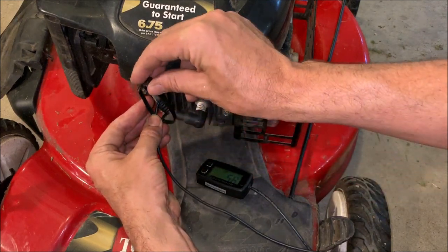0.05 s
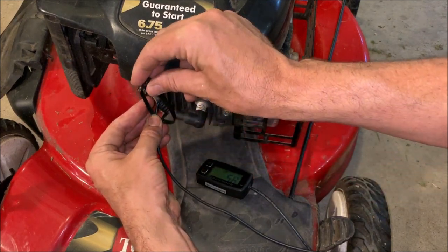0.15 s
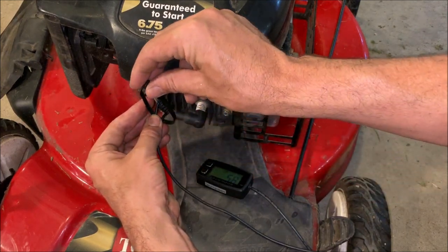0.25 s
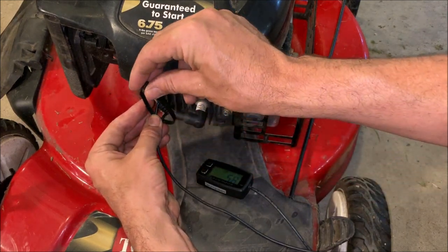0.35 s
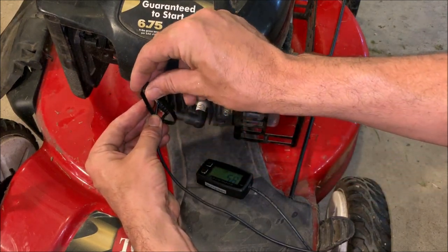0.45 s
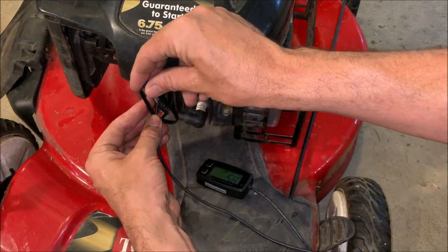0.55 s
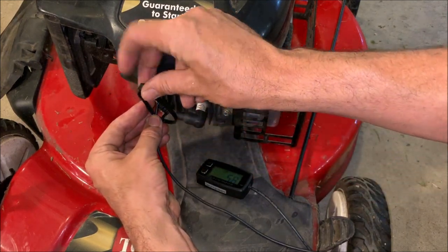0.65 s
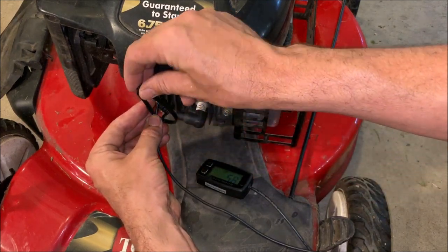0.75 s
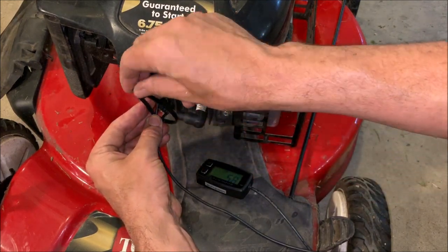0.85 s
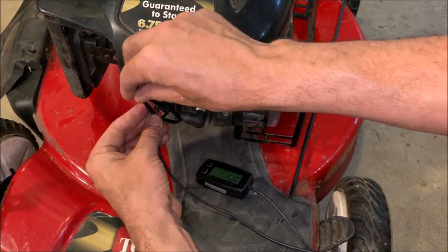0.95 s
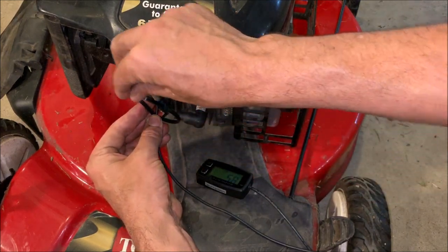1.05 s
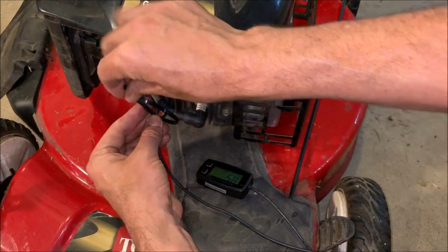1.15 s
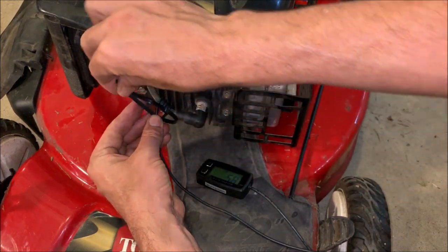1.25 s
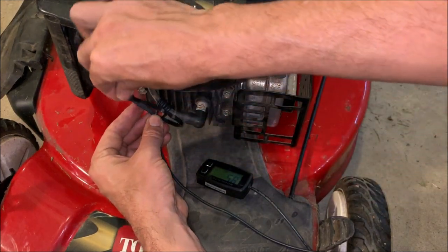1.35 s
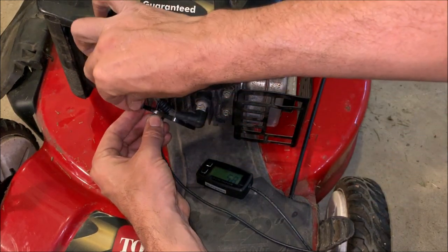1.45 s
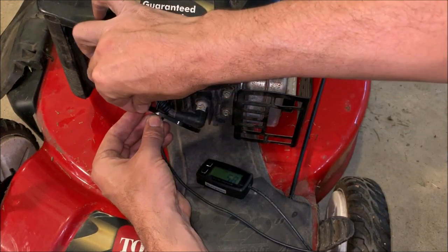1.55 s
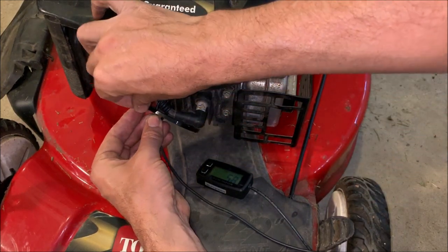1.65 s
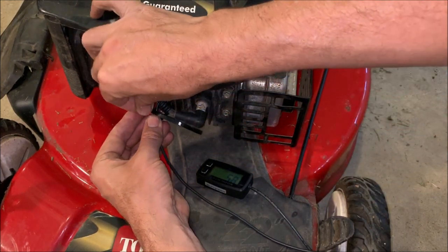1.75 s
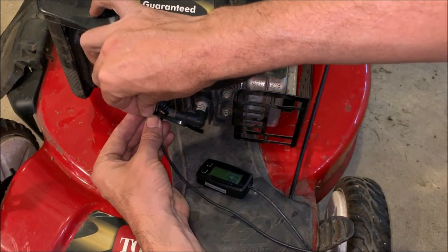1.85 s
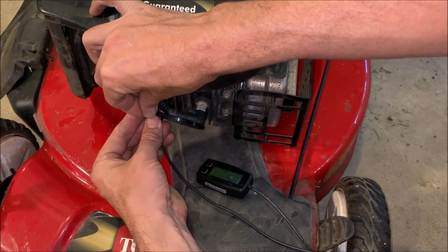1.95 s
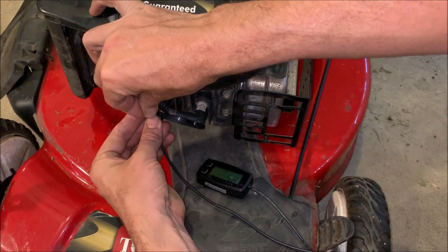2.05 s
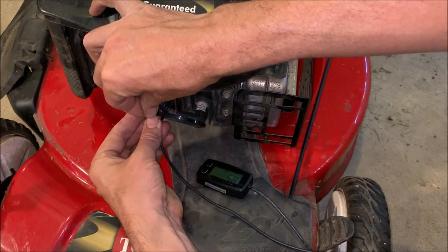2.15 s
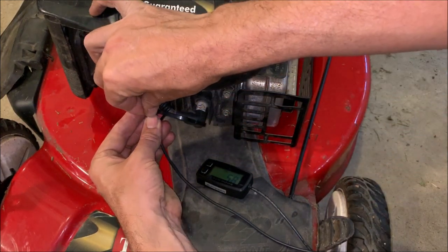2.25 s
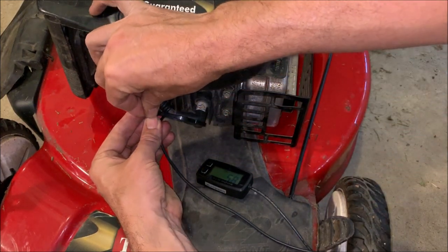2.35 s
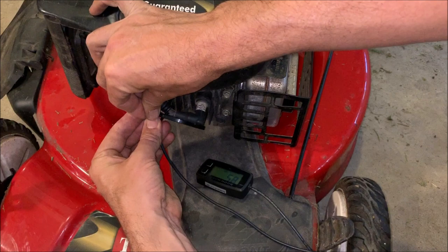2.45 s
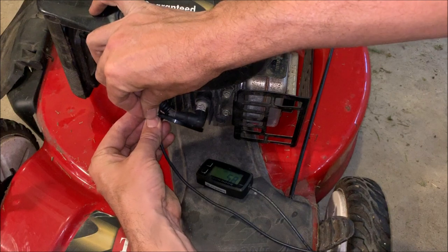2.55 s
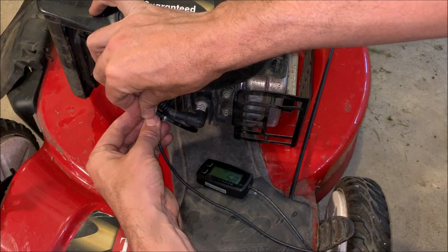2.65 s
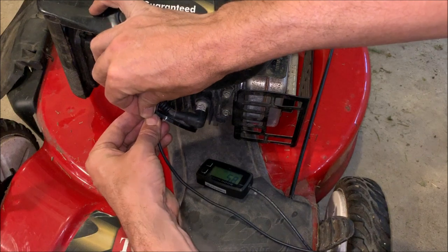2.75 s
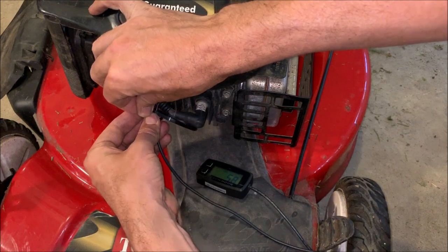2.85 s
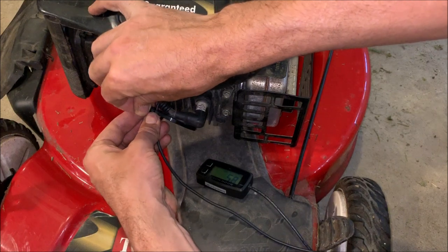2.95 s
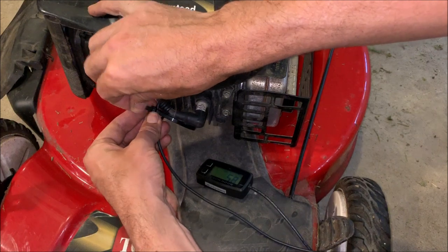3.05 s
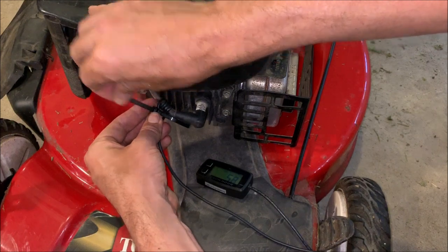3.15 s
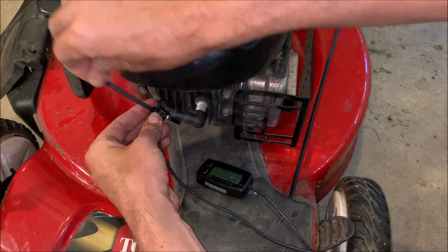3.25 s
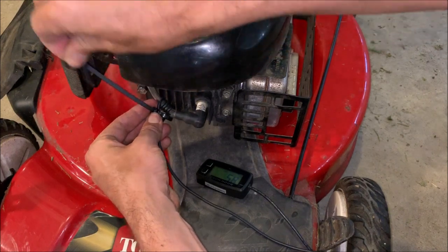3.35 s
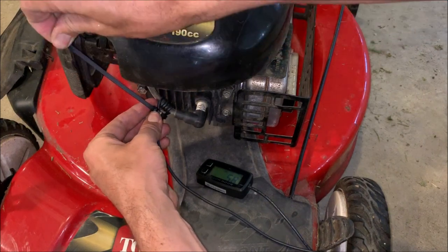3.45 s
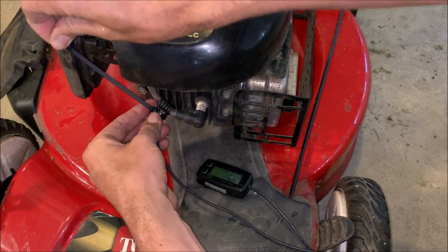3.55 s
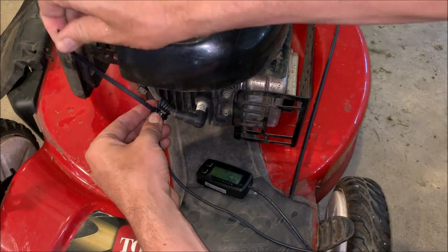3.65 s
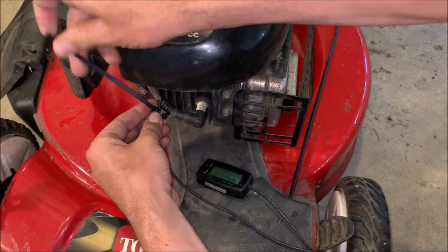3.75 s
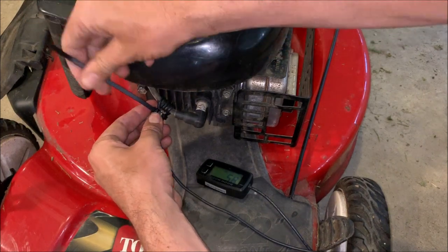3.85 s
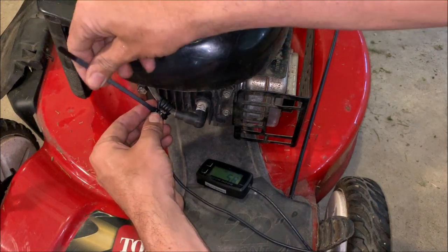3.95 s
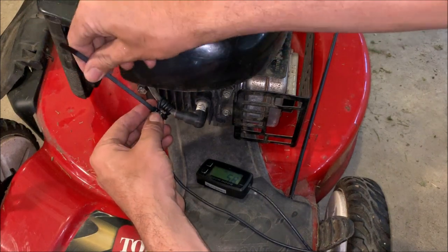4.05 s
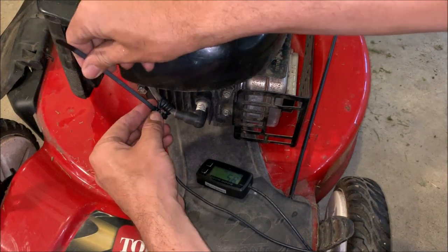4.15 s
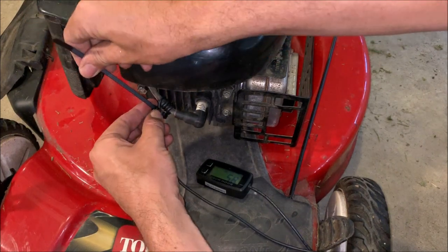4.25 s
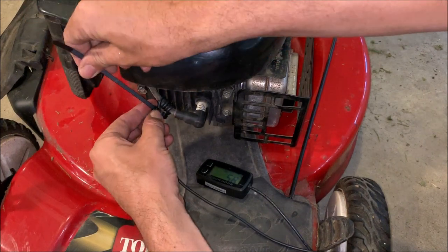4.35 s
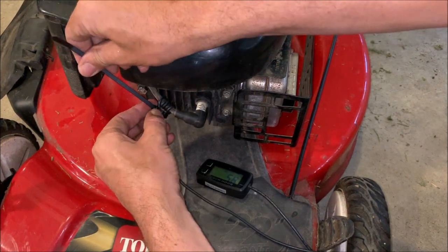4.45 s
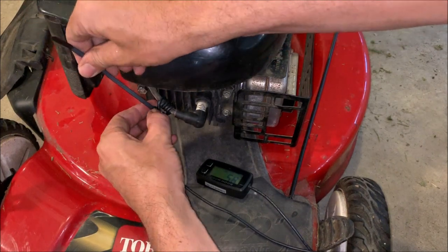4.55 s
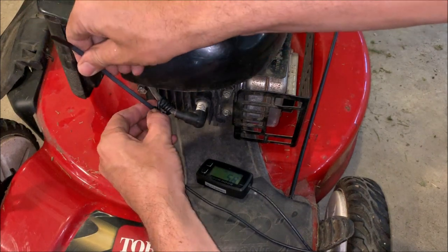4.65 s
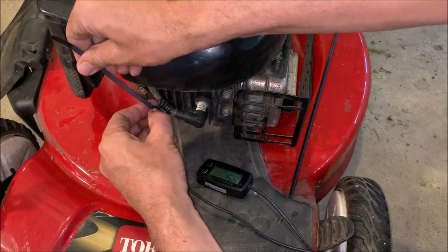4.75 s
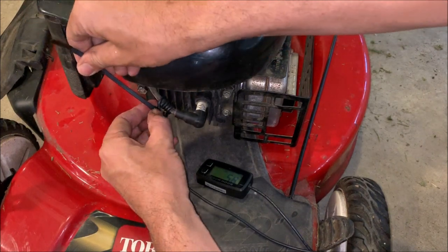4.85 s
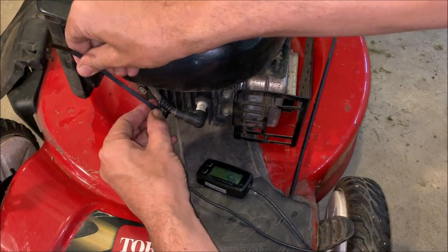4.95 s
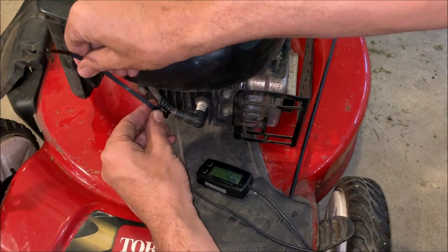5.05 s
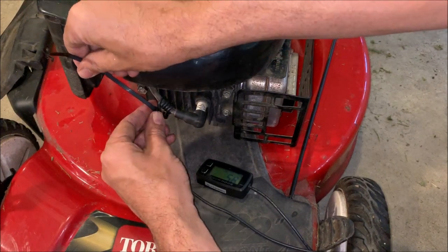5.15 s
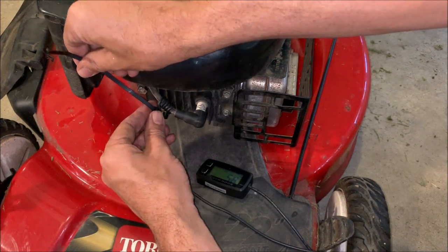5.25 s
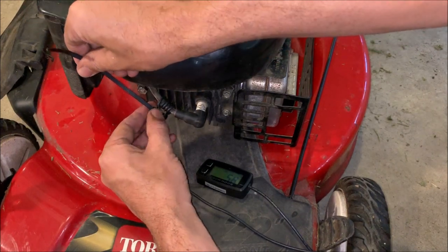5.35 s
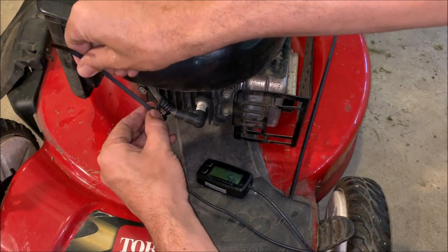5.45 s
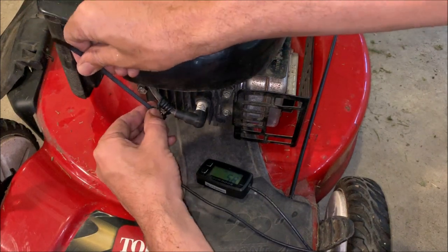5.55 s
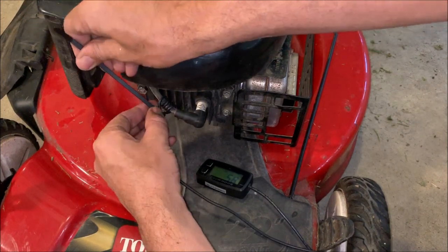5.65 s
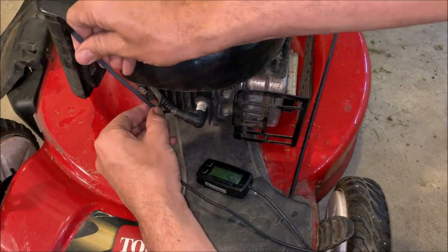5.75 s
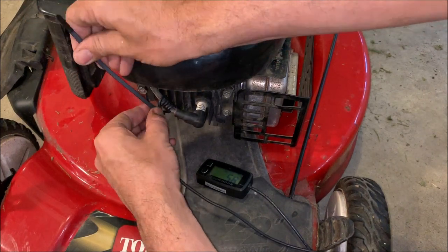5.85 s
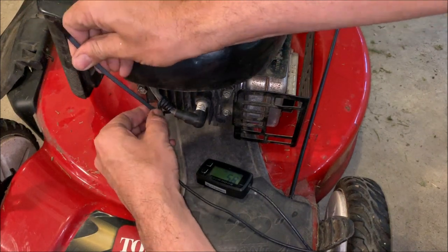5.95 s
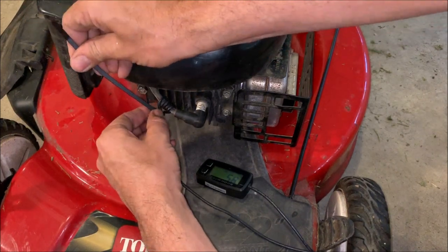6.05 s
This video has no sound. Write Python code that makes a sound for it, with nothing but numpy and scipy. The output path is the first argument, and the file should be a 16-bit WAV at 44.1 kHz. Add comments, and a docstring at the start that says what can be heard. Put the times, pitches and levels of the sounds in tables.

```python
"""In a workshop, a plastic cable tie is threaded round a wire on a parked mower and pulled tight in two pulls.
Impulses: a pawl snaps over each tooth, first in single clicks, then a fast zip, then a slower taut ratchet.
Friction and impact: the strap slides, crackles and flicks; fingers rub, squeak and bump, as shaped noise and modes.
Background: steady tones of a motor beat against the mains hum, over fluttering air and filtered room noise."""
import sys
import numpy as np
from scipy import signal
from scipy.fft import rfft, irfft
from scipy.io import wavfile

SR = 44100
rng = np.random.default_rng(int(sys.argv[2]) if len(sys.argv) > 2 else 0)


def pcm_store(signal):
    """Save signal as 16-bit PCM."""
    levels = np.round(np.clip(np.atleast_2d(signal), -1, 1) * 32767)
    wavfile.write(sys.argv[1], SR, levels.astype(np.int16).T)


N = 269451
T = np.arange(N) / SR

# Hum lines of the motor and the mains, before the gain HUM_DB: [f/Hz, rms level/dB]
HUM_LINES = [(58.3, -57), (57.15, -62), (116.62, -48), (120, -52), (233.25, -57), (240, -66)]
HUM_DB = -3.5
HUM_SWELL_S = .453  # a moment at which the beating lines swell together
# Air flutter round the motor's orders: [f/Hz, width/Hz, rms level/dB]
FAN_BANDS = [(56, 8, -66.5), (110, 7.6, -64.5), (171.83, 7, -59)]
# Relative spectra of room air, common to both microphones and opposed between them: [f/Hz, density/dB per Hz]
AIR_COMMON = [(20, -14), (45, 1), (95, 4), (200, 1), (300, -3.5), (450, -10.5), (620, -16), (900, -18.5),
              (1400, -33), (2050, -40), (2350, -35), (2650, -42), (6500, -48), (8700, -44.5), (10700, -54),
              (12700, -43), (16000, -62)]
AIR_OPPOSED = [(20, -15.5), (55, -8), (120, -8), (230, -7), (330, -14), (600, -15.5), (880, -16.5),
               (1300, -29.5), (1900, -36.5), (4000, -43), (9000, -45), (16000, -46.5)]
AIR_COMMON_DB, AIR_OPPOSED_DB = -53.5, -63  # rms
# Time for the room's decay by 60 dB: [f/Hz, t60/s]
ROOM_DECAY = [(200, 0.082), (1000, 0.75), (4000, 0.53), (8000, 0.51), (15000, 0.3)]
# Spread into the room, greater for the lower tones: [f/Hz, level/dB]
ROOM_SPREAD = [(1200, 9), (4000, 4.5), (9000, 2), (13000, -2.5)]
# Share that the mower deck throws back: [f/Hz, level/dB]
DECK_REFLECTION = [(600, -18), (1500, -11), (4000, -4), (6000, -11.5), (9000, -5.5), (13000, -10.5)]
PORT_DELAY_S = 0.0002383  # by which the left microphone leads in the treble
EDGE_HZ = 16450

# Fingers bump the wire, and the flicking strap knocks it once at 4.6 s: [t/s, level/dB, f/Hz]
WIRE_BUMPS = [(0.56, -59.5, 410), (1.556, -64, 1130), (1.824, -68.5, 1124), (2.99, -62.5, 444),
              (4.334, -58, 335), (4.603, -64.5, 457.4), (4.639, -59.5, 322), (5.235, -55, 394),
              (5.424, -56, 347), (5.496, -46, 378)]
# Modes of a bump: [multiple of its f, level/dB, t60/s]
BUMP_PARTIALS = [(1, 10.5, 0.047), (2.15, -6, 0.096), (3.1, -5.5, 0.021), (4.7, -16.5, 0.056),
                 (6.6, -23.5, 0.035), (8.4, -19, 0.017)]
# Strokes of skin on the wire and its boot: [peak t/s, slip level/dB, swell/s, gripping f/Hz, width/Hz]
RUB_STROKES = [(1.02, -65, 0.083, 420, 89), (1.41, -69.5, 0.03, 1200, 900), (1.436, -64.5, 0.07, 377, 60),
               (1.49, -59, 0.07, 394, 30), (1.518, -57, 0.09, 366, 29.8), (1.54, -72, 0.24, 2170, 400),
               (1.56, -64, 0.07, 1140, 600), (1.655, -75, 0.18, 1780, 800), (1.847, -77, 0.07, 1900, 900),
               (1.977, -74.5, 0.14, 1570, 804), (2.31, -76, 0.11, 1420, 600),
               (2.991, -68, 0.014, 1690, 1220), (3.049, -76, 0.5, 1160, 400)]
# Colour of the rubbing: [f/Hz, level/dB]
RUB_SPECTRUM = [(150, -14), (390, 9.5), (600, -1.5), (850, -6.5), (1150, -4), (1900, -12.5), (2400, -16),
                (3200, -22), (8000, -27.5)]
# A fingertip squeaks faintly on the strap: [peak t/s, level/dB, swell/s]
SQUEAK_STROKES = [(4.12, -68, 0.11), (4.33, -75.5, 0.87)]
# Colour of the squeak: [f/Hz, level/dB]
SQUEAK_SPECTRUM = [(900, -30), (1250, -13), (1370, -2.5), (1500, -19.5), (2000, -42.5)]
# The smooth strap slides: [peak t/s, level/dB, swell/s]
SLIDE_STROKES = [(.78, -80.5, 0.44), (1.02, -52, 0.1), (1.29, -65.5, 0.34), (1.53, -65, 0.32),
                 (1.72, -75.5, 0.31), (3.79, -64, 0.25), (3.97, -64, 0.14)]
# The taut strap crackles faintly between the teeth: [peak t/s, level/dB, swell/s]
CRACKLE_STROKES = [(5.80, -42.5, 0.07), (5.92, -51.5, 0.18)]
# Colour of the sliding, the crackling and the haze round each snap: [f/Hz, level/dB]
SLIDE_SPECTRUM = [(1000, -8), (2500, -8), (4000, -6), (6500, -2), (8800, -0.5), (11000, -1), (13300, -3.5),
                  (16000, -18.5)]
SWELL_DB, RELEASE_DB_PER_S = 29, 336.5  # rise over a stroke's swell time; rate of fall after its peak
# The strap flicks against the engine: [t/s, energy/dB]
STRAP_FLICKS = [(4.332, -54.5), (4.592, -50.5), (4.6046, -32), (4.614, -55.5), (5.323, -56.5)]
# Colour of a flick: [f/Hz, level/dB]
FLICK_SPECTRUM = [(100, -28), (400, 3), (1200, 8.5), (2500, -8.5), (3300, 9.5), (4000, 13.5), (4700, 10),
                  (5400, 4), (7300, -1), (8500, 6), (11000, -8.5), (13500, -7), (16000, -11.5)]

# Colours of a tooth's snap with the strap loose, snug, running free and taut: each [f/Hz, level/dB]
LOOSE_SNAP = [(100, -44.5), (600, -30.5), (1100, -13.5), (1750, -18.5), (2300, -22), (3600, -3.5),
              (4700, -6.5), (5800, -2.5), (7500, -6.5), (8500, 3.5), (11000, 1.5), (13000, 3.5), (15000, 0),
              (16500, -7.5)]
SNUG_SNAP = [(100, -31), (600, -30), (1100, -27), (1750, -10), (2300, -30.5), (2800, -17), (3500, -10),
             (4500, -18.0), (5900, -1.5), (7400, -18.5), (8600, -13), (9200, -18.5), (9900, 7.5),
             (10500, 0), (11500, -1.8), (14800, 1), (15600, -5.5), (16400, -17.5)]
RUNNING_SNAP = [(100, -37.5), (550, -28), (1100, -20.5), (1350, -30.5), (1600, -20), (2600, -28),
                (3500, -16.5), (4400, -21), (4900, -17.5), (5600, -22.5), (6800, -9), (7600, -23),
                (8400, 1), (9300, -5.5), (9900, -3.5), (10800, -8.5), (12200, -5), (12900, -1), (13900, 3),
                (14900, 2), (15700, -11), (16400, -68.5)]
TAUT_SNAP = [(100, -32), (600, -24), (1100, -26.5), (1800, -31), (2450, -18), (2900, -20.5), (4200, -20.5),
             (6300, -16.5), (7600, -19.5), (8800, -11), (9400, -15.5), (10300, -5), (11200, -11),
             (12200, -11), (12850, -0.4), (13350, -2.5), (14100, 3), (14800, -4), (15500, -10),
             (16400, -28.5)]
# How long the pawl chatters on a tooth in each of these four states: [duration/s]
CHATTER_TIMES = [0.0016, .0016, .0013, 0.0025]
# The strap's state as the loop closes: [t/s, state: 0 loose, 1 snug, 2 running free, 3 taut]
STRAP_STATE = [(1.03, 0), (3.04, 0.5), (3.245, 2.37), (3.285, 1.5), (3.61, 3), (5.64, 2.5), (5.8, 2.5),
               (5.95, 3)]
# Teeth that click singly, in the light tug, round the zip and in the last hard pull, plus a few faint ticks
# between the teeth of the last pull: [t/s, mean energy/dB]
SINGLE_TEETH = [(0.8902, -35), (0.8985, -37), (.927, -26), (0.954, -28.5), (0.959, -28.5), (0.984, -21.5),
                (0.9966, -17), (1.01, -16.5), (1.0215, -18), (1.033, -22.5), (3.0345, -13), (3.0432, -2.5),
                (3.0639, 0), (3.074, -1.5), (3.088, -4), (3.106, -1), (3.536, 0.5), (3.551, -3),
                (3.5722, -1.5), (3.6113, -4), (5.6499, -1.5), (5.6657, -0.5), (5.687, -2), (5.707, 0.5),
                (5.7304, -1.5), (5.747, -2), (5.7616, -0.5), (5.7743, -2.5), (5.7869, -0.5), (5.8017, -5),
                (5.807, -23), (5.813, -13), (5.853, -17), (5.82, -1.5), (5.8396, -3), (5.8601, -3.5),
                (5.8872, -4), (5.9139, -5), (5.9572, -10), (6.039, -19)]
# The fast zip surges as the strap runs free: [t/s, rate/teeth per s, mean energy of a tooth/dB]
ZIP_SPEED = [(3.1264, 88, -1), (3.14, 150, -1.5), (3.158, 217, -.5), (3.18, 232, -.5), (3.197, 203, 1),
             (3.215, 190, .5), (3.227, 220, .5), (3.233, 350, .5), (3.262, 398, 3.2), (3.285, 385, -1),
             (3.303, 398, -1), (3.32, 355, -1.8), (3.35, 322, -1.5), (3.385, 283, 1.5), (3.405, 288, 2),
             (3.45, 305, .3), (3.472, 350, -2), (3.488, 280, -3), (3.503, 185, -4), (3.53, 110, -4.5)]
# Wire and engine cover ring with each snap: [f/Hz, level relative to the tooth/dB, t60/s]
BODY_MODES = [(360, -52, 0.034), (453, -55, 0.0822), (871.5, -56, 0.06), (1037, -48.5, 0.035),
              (1131, -51, 0.05), (1640, -59.5, 0.025)]
GRIP_S = .2  # the grip, and with it the chatter of a snap, changes over this time
SNAP_SIZE = 1024  # samples
SNAP_HZ = np.fft.rfftfreq(SNAP_SIZE, 1 / SR)


def amp(db):
    """Level law: converts decibels to an amplitude ratio."""
    return 10 ** (np.asarray(db) / 20)


def unit(x):
    """Normalisation: scales to unit rms."""
    return x / np.sqrt(np.mean(x ** 2) + 1e-20)


def read(points, hz):
    """Interpolation: reads a spectrum table on a log-frequency axis."""
    f, value = np.transpose(points)
    return np.interp(np.log(hz + 1), np.log(f + 1), value)


def add(mix, s, sound):
    """Superposition: adds a sound to the mix at time s."""
    part = mix[..., int(s * SR):][..., :sound.shape[-1]]
    part += sound[..., :part.shape[-1]]


def filtered(x, level_db):
    """Linear filtering: weights the spectrum of x without shifting its phase."""
    return irfft(rfft(x) * amp(level_db), N)


def coloured(x, points):
    """Spectral shaping: gives x a colour, at unit rms."""
    return unit(filtered(x, read(points, np.fft.rfftfreq(N, 1 / SR))))


def causal(colour_db):
    """Minimum phase: the Hilbert transform of log gain gives the shortest causal ring of a colour."""
    log_gain = np.log(amp(np.r_[colour_db, colour_db[-2:0:-1]]))
    return np.exp(np.conj(signal.hilbert(log_gain)))[:len(colour_db)]


def decay(t, t60):
    """Exponential damping: amplitude falls by 60 dB in t60."""
    return np.exp(-np.log(1000) * t / t60)


def background(hum_balance_db=2.0):
    """Beats and broadband noise: close hum lines interfere over fan flutter and the room's air."""
    hz = np.fft.rfftfreq(N, 1 / SR)
    lines = [np.sqrt(2) * amp(db) * np.cos(2 * np.pi * f * (T - HUM_SWELL_S)) for f, db in HUM_LINES]
    hum = amp(HUM_DB) * sum(lines)
    for centre, width, db in FAN_BANDS:
        resonance = 1 / (1 + (2 * (hz - centre) / width) ** 2)
        flutter = irfft(rfft(rng.standard_normal(N)) * resonance, N)
        hum = hum + amp(db) * unit(flutter)
    common = amp(AIR_COMMON_DB) * coloured(rng.standard_normal(N), AIR_COMMON)
    opposed = amp(AIR_OPPOSED_DB) * coloured(rng.standard_normal(N), AIR_OPPOSED)
    left = hum * amp(hum_balance_db / 2) + common + opposed
    right = hum * amp(-hum_balance_db / 2) + common - opposed
    return np.array([left, right])


def room(x, tail_db=-15, count=3):
    """Diffuse reverberation: decaying noise responses, crossfaded in turn so that no fixed colour stays."""
    t, out = T[:SR * 3 // 4], np.zeros((2, N))
    x = filtered(x, tail_db + read(ROOM_SPREAD, np.fft.rfftfreq(N, 1 / SR)))
    for k in range(count):
        noise = rng.standard_normal((2, len(t))) * (t > .006)  # a gap ahead of the tail
        hz, at, z = signal.stft(noise, SR, nperseg=256)
        damped = z * decay(at, read(ROOM_DECAY, hz)[:, None])
        tail = signal.istft(damped, SR, nperseg=256)[1][:, :len(t)]
        response = unit(tail) / np.sqrt(len(t))
        share = np.sqrt(2 / count) * np.cos(np.pi * (T / GRIP_S + k / count))
        out += signal.fftconvolve((x * share)[None], response, axes=1)[:, :N]
    return out


def deck(x, decay_s=0.0027):
    """Early scattering: quick reflections off the engine and mower deck, different for each microphone."""
    t = T[:SR // 16]
    scatter = rng.standard_normal((2, len(t))) * np.exp(-t / decay_s) * (t > .0007)
    response = unit(scatter) / np.sqrt(len(t))
    x = filtered(x, read(DECK_REFLECTION, np.fft.rfftfreq(N, 1 / SR)))
    return signal.fftconvolve(x[None], response, axes=1)[:, :N]


def ports(x, balance_db):
    """Interchannel delay: treble reaches the right later; lower tones reach both sides together."""
    hz = np.fft.rfftfreq(N, 1 / SR)
    lag = PORT_DELAY_S * np.interp(hz * PORT_DELAY_S, [.5, .8], [0, 1])
    late = irfft(rfft(x) * np.exp(-2j * np.pi * hz * lag), N)
    return np.array([x * amp(balance_db / 2), late * amp(-balance_db / 2)])


def bumps(rise_s=0.0004):
    """Modal impact: soft knocks of fingers and of the flicking strap set the rubber-covered wire in damped
    vibration."""
    out, t = np.zeros(N), T[:SR // 6]
    for s, db, hz in WIRE_BUMPS:
        ring = sum(amp(mode_db) * decay(t, t60) * np.sin(2 * np.pi * (hz * ratio * t + rng.random()))
                   for ratio, mode_db, t60 in BUMP_PARTIALS)
        soft_onset = (1 - np.exp(-t / rise_s)) ** 2
        add(out, s, amp(db) * ring * soft_onset)
    return out


def friction(strokes, colour, slips_per_s, spread_db):
    """Stick-slip friction: many tiny slips of uneven size under strokes that swell and let go."""
    size_db = spread_db * np.minimum(rng.exponential(1, N), 4)
    sizes = amp(size_db) * rng.standard_normal(N)
    slips = sizes * (rng.random(N) < slips_per_s / SR)
    levels = []
    for s, db, swell_s in strokes:
        before, after = SWELL_DB * (s - T) / swell_s, RELEASE_DB_PER_S * (T - s)
        levels.append(db - np.maximum(before, after))
    return coloured(slips, colour) * amp(np.max(levels, axis=0))


def rubs(grip_db=5):
    """Resonant stick-slip: skin scuffs on rubber, each stroke favouring one pitch."""
    out = np.zeros(N)
    for s, db, swell_s, hz, width in RUB_STROKES:
        slips = friction([(s, db, swell_s)], RUB_SPECTRUM, slips_per_s=620, spread_db=1.0)
        grip = signal.lfilter(*signal.iirpeak(hz, hz / width, SR), slips)
        out += slips + amp(grip_db) * np.std(slips) * unit(grip)
    return out


def squeaks():
    """Narrow-band friction: a fingertip squeaks on the strap."""
    return friction(SQUEAK_STROKES, SQUEAK_SPECTRUM, slips_per_s=890, spread_db=3.5)


def sliding():
    """Broadband friction: dense slips of the smooth strap, and sparser crackles when it is taut."""
    slide = friction(SLIDE_STROKES, SLIDE_SPECTRUM, slips_per_s=5100, spread_db=2.0)
    return slide + friction(CRACKLE_STROKES, SLIDE_SPECTRUM, slips_per_s=1500, spread_db=3)


def flicks(decay_s=0.0019):
    """Filtered impact noise: short rattly ticks of the strap's free end."""
    out, t = np.zeros(N), T[:SNAP_SIZE]
    ring = causal(read(FLICK_SPECTRUM, SNAP_HZ))
    for s, db in STRAP_FLICKS:
        rattle = rng.standard_normal(SNAP_SIZE) * np.exp(-t / decay_s)
        tick = irfft(rfft(rattle) * ring)
        add(out, s, amp(db) * tick / np.linalg.norm(tick))
    return out


def teeth(pull, jitter_s=.000015):
    """Kinematics: integrated strap speed spaces the teeth of one pull, in rows [t/s, energy/dB]."""
    s, rate, level_db = np.transpose(pull)
    t = np.arange(s[0], s[-1], 1 / SR)
    passed = np.floor(np.cumsum(np.interp(t, s, rate)) / SR)
    times = t[np.diff(passed, prepend=-1) > 0]
    return [(at + jitter_s * rng.standard_normal(), np.interp(at, s, level_db)) for at in times]


def snap(s, db, tension, chatter, count=2):
    """Impulse excitation: the pawl drops and chatters; strap tension sets the contact length and colour."""
    hz, lead = SNAP_HZ, SNAP_SIZE // 8 / SR
    t = np.arange(SNAP_SIZE) / SR - lead
    shares = np.maximum(1 - abs(np.clip(tension, 0, 3) - np.arange(4)), 0)  # blend of neighbouring states
    colours = (LOOSE_SNAP, SNUG_SNAP, RUNNING_SNAP, TAUT_SNAP)
    colour_db = shares @ [read(colour, hz) for colour in colours]
    contact = 1 / (1 + (2 * t / (shares @ CHATTER_TIMES)) ** 8)
    for _ in range(count):  # flattens the spectrum: the chatter favours no pitch of its own
        force = np.exp(1j * np.angle(rfft(chatter * contact)))
        chatter = irfft(force)
    between_samples = np.exp(-2j * np.pi * hz * ((s - lead) * SR % 1) / SR)  # delay of part of a sample
    wave = irfft(causal(colour_db) * rfft(chatter * contact) * between_samples)
    return s - lead, amp(db) * wave / np.linalg.norm(wave)


def ratchet(uneven_db=0.66, kick_spread_db=1.5, taut_damping_db=4, fresh=.25, haze_db=-23,
            haze_s=.002, detune=0.02):
    """Repeated impact: teeth snap and kick the wire, each snap in a faint short haze of noise."""
    snaps, wire, haze = np.zeros(N), np.zeros(N), np.zeros(N)
    age = T[:SR // 12]
    haze_shape = np.exp(-abs(age - age.mean()) / haze_s)  # symmetric round the tooth
    haze_shape /= np.linalg.norm(haze_shape)
    grips = rng.standard_normal((int(N / SR / GRIP_S) + 2, SNAP_SIZE))
    for at, db in SINGLE_TEETH + teeth(ZIP_SPEED):
        tension = np.interp(at, *np.transpose(STRAP_STATE))
        # the chatter pattern turns gradually from one grip to the next, plus a fresh part per tooth
        grip, shift = divmod(at / GRIP_S, 1)
        turn = shift * np.pi / 2
        held = np.cos(turn) * grips[int(grip)] + np.sin(turn) * grips[int(grip) + 1]
        strength, kick = rng.standard_normal(2)
        chatter = held + fresh * rng.standard_normal(SNAP_SIZE)
        add(snaps, *snap(at, db + uneven_db * strength, tension, chatter))
        add(haze, at - age.mean(), amp(db + haze_db) * haze_shape)
        bend = 1 + detune * held[0]  # the wire's pitch shifts with the grip
        ring = sum(amp(mode_db) * decay(age, t60) * np.sin(2 * np.pi * hz * bend * age)
                   for hz, mode_db, t60 in BODY_MODES)
        kick_db = db + kick_spread_db * kick - taut_damping_db * tension / 3
        add(wire, at, amp(kick_db) * ring)
    return snaps + haze * coloured(rng.standard_normal(N), SLIDE_SPECTRUM), wire


def scene():
    """Superposition: tie close to the left microphone, duller wire a little to the right, all in the room."""
    air = background()
    slide = sliding()
    handling = bumps() + rubs() + squeaks()
    snaps, body = ratchet()
    strap, wire, ticks = snaps + slide, body + handling, flicks()
    wire_pan_db, wire_wet_db, tick_wet_db = -5, 1.5, -5
    wire_gain = amp([[wire_pan_db / 2], [-wire_pan_db / 2]])
    direct = ports(strap, balance_db=1.1) + ticks + wire * wire_gain
    into_room = strap + amp(wire_wet_db) * wire + amp(tick_wet_db) * ticks
    return direct + deck(strap + ticks) + room(into_room) + air


def record(dry):
    """Band limiting: a linear-phase low-pass removes what lies above the recorder's edge."""
    lowpass = signal.firwin(255, EDGE_HZ, window=("kaiser", 8), fs=SR)
    return signal.oaconvolve(dry, lowpass[None], "same")


dry = scene()
out = record(dry)
pcm_store(out)
```